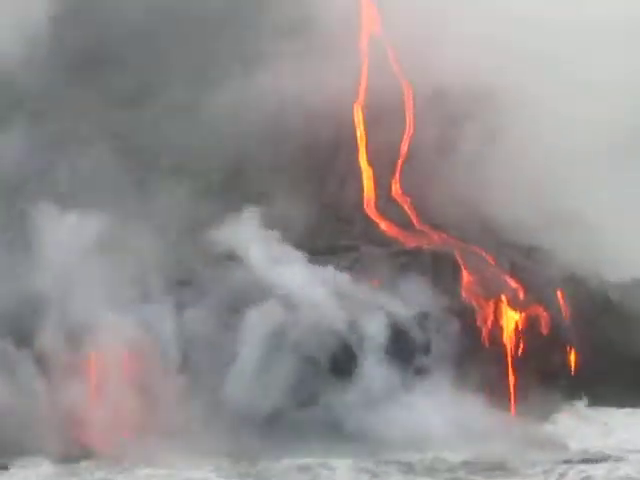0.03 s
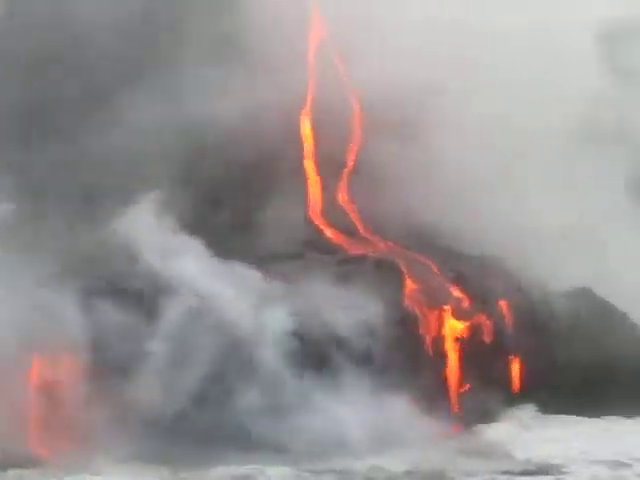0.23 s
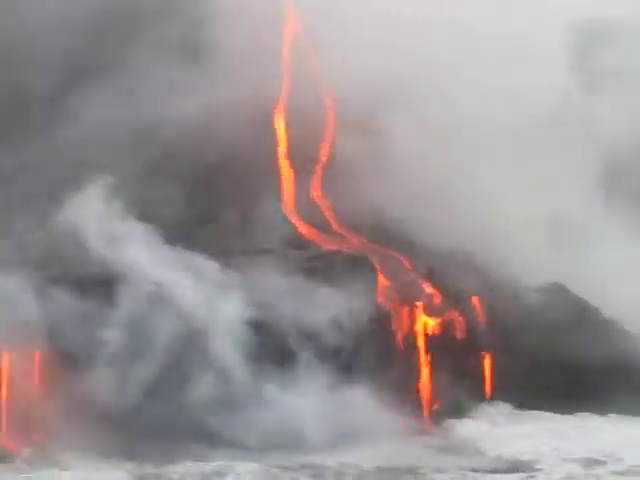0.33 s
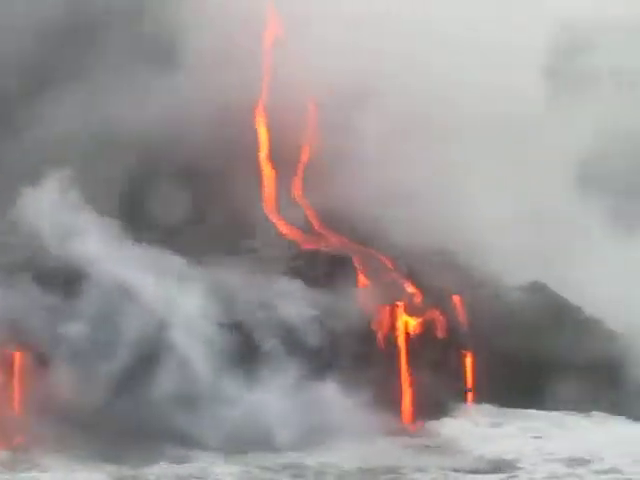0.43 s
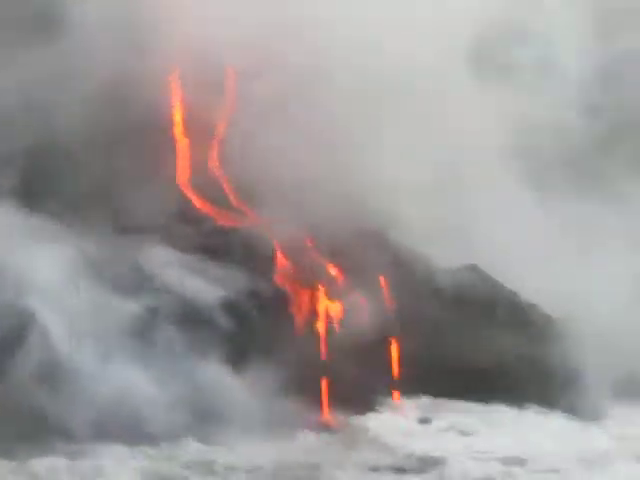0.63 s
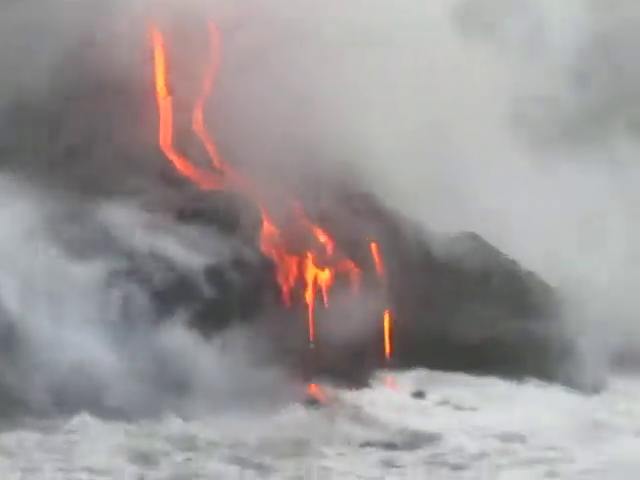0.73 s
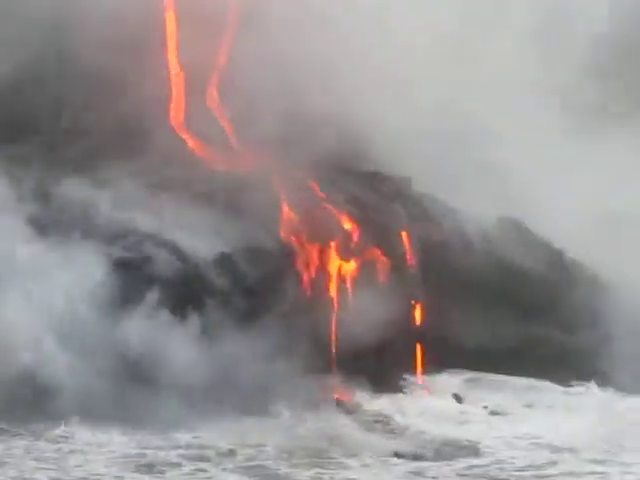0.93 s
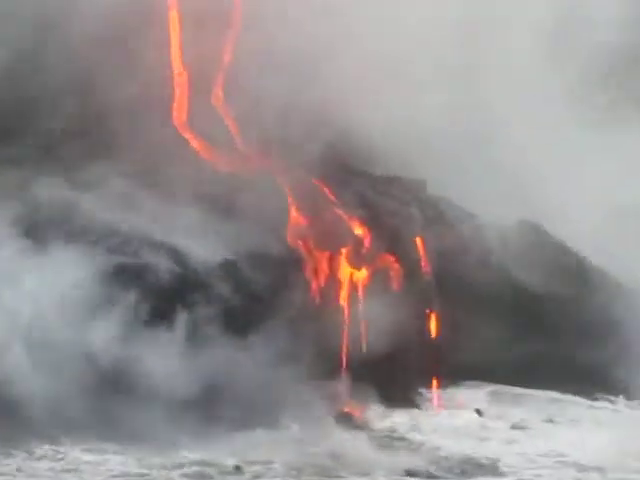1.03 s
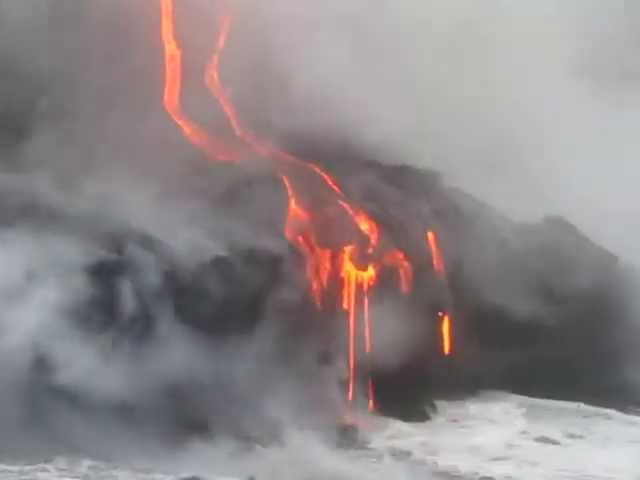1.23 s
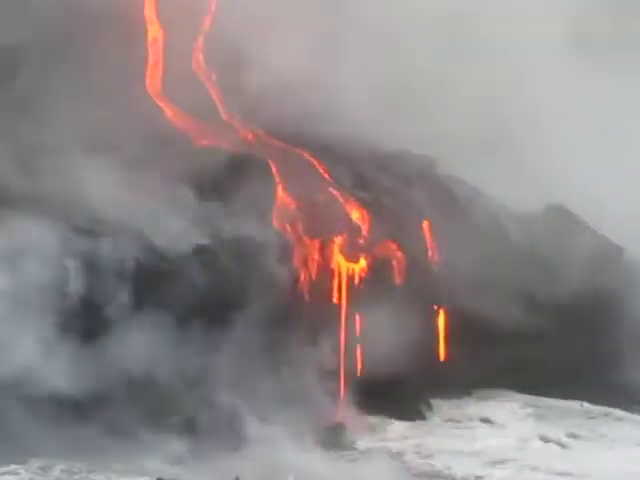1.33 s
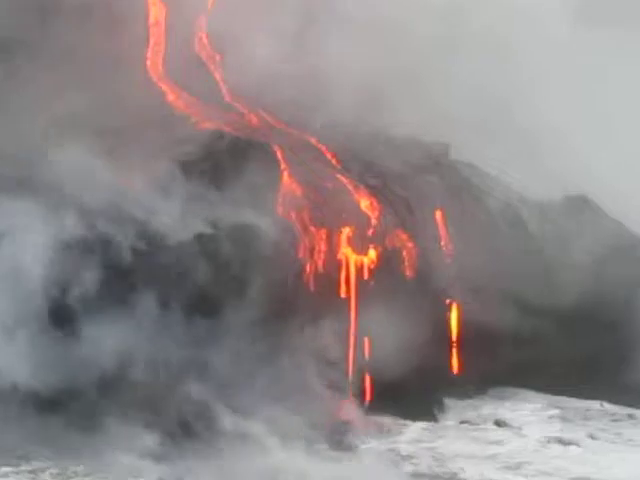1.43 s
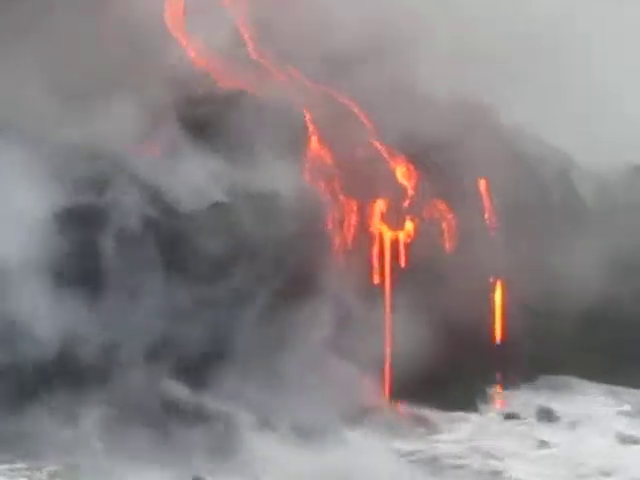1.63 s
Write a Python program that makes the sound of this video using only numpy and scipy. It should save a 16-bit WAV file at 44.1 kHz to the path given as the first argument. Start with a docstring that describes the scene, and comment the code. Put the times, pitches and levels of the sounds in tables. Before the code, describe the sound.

Very close handling noise on a small hand-held camera: one loud dry clack, a weaker knock and brief finger rub, later a light tick, over faint even hiss of sea and lava steam and low wind rumble.

```python
"""Sea cliff, heard from a boat through a small hand-held camera: surf and steam hiss steadily (shaped noise).
The plastic camera body clicks and knocks a few times (blows ring its damped modes).
The hand shoves it with low thumps (smooth pressure pulses) and a finger rubs it (dense slips ring the modes).
Wind and handling rumble lies below (low noise)."""
import sys
import numpy as np
from scipy import signal
from scipy.io import wavfile
from scipy.ndimage import uniform_filter1d

SR = 44100
rng = np.random.default_rng(int(sys.argv[2]) if len(sys.argv) > 2 else 0)


def put_to_file(sound):
    """Save the sound as 16-bit audio at rate SR, in the file named by the first command-line argument."""
    columns = np.atleast_2d(sound).T  # one column per channel
    safe = np.clip(columns, -1, 1)
    whole_steps = np.round(safe * 32767)
    wavfile.write(sys.argv[1], SR, whole_steps.astype(np.int16))


N = 74970


def amp(db):
    """Amplitude factor of a level in dB."""
    return 10 ** (np.asarray(db) / 20)


def evened(x):
    """Scale to unit RMS."""
    return x / np.sqrt(np.mean(x ** 2) + 1e-20)


def curve(points):
    """Per-sample gain from (time_s, level_db): silent before the first point, held after the last."""
    time_s, level_db = np.transpose(points)
    return amp(np.interp(np.arange(N) / SR, time_s, level_db, -200, level_db[-1]))


def noise(spectrum, size, patchy_db, flicker_db):
    """Unit-RMS noise: random short-time spectra, drifting patches, a flicker shared by all pitches."""
    frames = 4 * N // size + 5
    bin_hz = np.fft.rfftfreq(size, 1 / SR)
    real, imag, patches = rng.standard_normal((frames, len(bin_hz), 3)).T
    patches = uniform_filter1d(patches, size=16, axis=0)  # across pitch
    patches = evened(uniform_filter1d(patches, size=10, axis=1))  # across time
    flicker = evened(uniform_filter1d(rng.standard_normal(frames), size=3))
    freq_hz, density_db = np.transpose(spectrum)
    shape_db = np.interp(np.log(bin_hz + 1), np.log(freq_hz + 1), density_db, -90, -90)[:, None]
    gain = amp(shape_db + patchy_db * patches + flicker_db * flicker)
    _, x = signal.istft((real + 1j * imag) * gain, nperseg=size, noverlap=3 * size // 4)
    return evened(x[:N])


# surf and steam spectrum: freq_hz [Hz], density_db [dB per Hz, relative]
HISS_SPECTRUM = [(40, -17), (100, -15.5), (200, -23.5), (420, -23), (700, -26), (890, -23.5), (1050, -27.5),
                 (1250, -26), (1450, -30), (1600, -21.5), (1780, -26), (1950, -27.5), (2500, -29),
                 (3150, -29), (3600, -26.5), (4150, -31), (4500, -36), (5800, -32.5), (8000, -37.5),
                 (10900, -39), (12000, -46.5), (14000, -51), (15600, -55), (16400, -56)]
# surf and steam level: time_s [s], level_db [dB]
HISS_LEVEL_DB = [(0, -51.5), (.2, -51.5), (.5, -53), (.8, -53), (1.1, -51.5), (1.35, -53), (1.7, -52.5)]


def surf_and_steam():
    """Surf and steam: broadband noise with slight patches and flicker."""
    return curve(HISS_LEVEL_DB) * noise(HISS_SPECTRUM, size=1024, patchy_db=0.6, flicker_db=1.2)


# camera body modes: freq_hz [Hz], level_db [dB, relative], t60_s [s]
BODY_MODES = [(180, -1, 0.083), (324, -10, 0.042), (540, -15, 0.036), (685, 7, 0.0072), (848, -5.5, 0.037),
              (924, 2, 0.024), (1260, 2, 0.022), (1678, 0.5, 0.018), (1860, 0.5, 0.015),
              (2105, 5.5, 0.0054), (2910, -2, 0.014), (3635, 1, 0.008), (4102, 3.5, 0.0067),
              (4665, 4.5, 0.0027), (5830, -1, 0.0087), (6600, 0, 0.0052), (8170, 8, 0.0034),
              (10060, 0.5, 0.005), (13700, -5.5, 0.0053)]
RISE_CYCLES = 0.42  # build-up constant of a mode, in its own cycles


def body_ring(pitch_hz, breadth_octaves, t60_share):
    """Body's answer to one contact: damped modes, those near the contact's pitch ring most."""
    freq_hz, level_db, t60_s = np.transpose(BODY_MODES)[:, :, None]
    t = np.arange(4000) / SR
    nearness = np.exp(-.5 * (np.log2(freq_hz / pitch_hz) / breadth_octaves) ** 2)
    rise = (1 - np.exp(-t * freq_hz / RISE_CYCLES)) ** 2
    decay = amp(level_db - 60 * t / (t60_share * t60_s))
    return (nearness * rise * decay * np.sin(2 * np.pi * freq_hz * t)).sum(0)


# blows on the body: start_s [s], level_db [dB], pitch_hz [Hz, of the contact], breadth_octaves [octaves],
# t60_share [ring length, share of mode t60], direction [signed strength of the clean contact]
BODY_BLOWS = [(.1559, -26.5, 9800, 1.24, 0.94, -1.09), (.1570, -26.5, 3530, 0.073, 1.8, 1),
              (.159, -40, 6850, 0.16, 2.2, 0.92), (.2164, -30, 4000, 1.2, .8, -1),
              (.2174, -17.5, 1590, 0.23, 0.6, 1), (.2196, -14.5, 1120, 0.95, 0.74, 0.76),
              (.2222, -2.5, 2810, 0.88, 0.61, -1.01), (.2226, -22, 384, 0.64, 0.89, -0.39),
              (.2242, -9, 3070, 1.29, 0.76, -0.38), (.2263, -14.5, 2140, 0.78, 0.23, -1),
              (.228, -42, 9050, .6, 1.1, 0.41), (.2298, -39, 1470, 0.32, 0.64, -0.51),
              (.2355, -35, 1600, 0.44, 0.53, -0.93), (.2426, -29, 2320, 0.58, 1.2, -1.14),
              (.2455, -22, 764, 0.16, 1.68, 0.93), (.2515, -38, 1090, .7, 1.4, 0.84),
              (.262, -55, 850, 0.37, 1.7, 0.62), (.2497, -45.5, 8000, 0.76, 1.4, 0.82),
              (.2695, -50, 5000, 1.6, 1.2, 0.79), (0.2986, -51, 3180, 0.34, 1.6, 0.8),
              (0.334, -41, 880, .3, 1.2, 0.6), (.398, -59, 3500, 0.72, .9, 1),
              (0.404, -39, 3220, 0.55, 1.3, 0.89), (0.4141, -38.5, 1620, 0.14, 1.5, 1),
              (0.417, -31, 1420, 1.1, 1.36, -0.13), (.4185, -45, 400, 0.66, 0.73, -1),
              (.4195, -26, 945, 0.22, 0.75, 0.35), (.4242, -37, 880, 0.52, 1.1, 0.84),
              (.433, -50, 600, 0.41, 0.92, 1), (.446, -39.5, 444, 0.97, 1.2, 0.88),
              (.452, -45, 11230, 0.36, 1, 0.81), (.461, -50, 10000, 0.36, 1, 0.85),
              (.659, -48, 9000, 1.2, 0.94, 0.94), (.698, -53.5, 9000, 1.9, 1.1, 1),
              (.7215, -38, 6800, 0.16, 1.3, 1), (.7343, -44, 7800, 1.8, 1.05, 0.75),
              (1.078, -47.5, 8500, 0.57, 1, 1), (1.4171, -25, 7100, 0.37, .9, -0.69),
              (1.4182, -22, 2410, 1.8, 0.87, 1), (1.4196, -19, 1800, 2.3, .6, 0.14),
              (1.4207, -33.5, 1190, 0.91, 1.1, 0.59), (1.4212, -46, 9000, 0.73, 1.1, 0.91),
              (1.4244, -32.5, 169.4, .4, 1.03, 1)]
RATTLE_DB, RATTLE_T60_S = -9, 0.017  # rattle energy re a unit contact


def clicks():
    """Blows ring the body: a clean contact, then a brief decaying rattle of loose parts."""
    out = np.zeros(N + 5000)
    t = np.arange(600) / SR
    rattle_gain = amp(RATTLE_DB - 60 * t / RATTLE_T60_S) / np.sqrt(RATTLE_T60_S * SR / 14)
    rattles = rng.standard_normal((len(BODY_BLOWS), 600)) * rattle_gain
    for blow, rattle in zip(BODY_BLOWS, rattles):
        start_s, level_db, pitch_hz, breadth_octaves, t60_share, direction = blow
        contact = np.append(direction, rattle)
        knock = np.convolve(contact, body_ring(pitch_hz, breadth_octaves, t60_share))
        out[round(start_s * SR):][:4600] += amp(level_db) * knock
    return out[:N]


# low shoves of the hand: middle_s [s], length_s [s, 4 sigma], level_db [dB before the high-pass],
# direction [signed strength]
HAND_SHOVES = [(0.148, .03, -53, 0.7), (.224, 0.0071, -26, -0.8), (0.251, 0.027, -20, 0.62),
               (0.27, .016, -25, 0.83), (0.314, 0.016, -33, 1), (0.428, 0.026, -27.5, -1),
               (0.45, 0.015, -29.5, 0.93), (0.48, 0.022, -34, 0.87), (0.5, 0.025, -38, 0.78),
               (0.509, 0.015, -37.5, -1.1), (.575, 0.027, -43, 0.91), (.62, 0.037, -42, -1.4),
               (0.643, 0.026, -39, 0.95), (0.757, 0.04, -38, 1), (0.84, 0.035, -37, -1.34)]
SHOVE_CUT_HZ = 11


def shoves():
    """Smooth one-sided pushes of pressure that leak away below the microphone's range."""
    t = np.arange(N) / SR
    push = np.zeros(N)
    for middle_s, length_s, level_db, direction in HAND_SHOVES:
        push += direction * amp(level_db) * np.exp(-.5 * ((t - middle_s) / (length_s / 4)) ** 2)
    return signal.lfilter(*signal.butter(1, SHOVE_CUT_HZ, "high", fs=SR), push)


# finger rub: time_s [s], level_db [dB]
RUB_LEVEL_DB = [(.3, -70), (.33, -72), (.37, -53.5), (.41, -51.5), (.425, -53), (.47, -95), (.5, -70)]
RUB_SLIPS_PER_S, RUB_PITCH_HZ, RUB_BREADTH_OCTAVES = 3300, 2170, 1.33


def rub():
    """Dense tiny random slips of skin ring the body."""
    slips = rng.standard_normal(N) * (rng.random(N) < RUB_SLIPS_PER_S / SR)
    ring = body_ring(RUB_PITCH_HZ, RUB_BREADTH_OCTAVES, t60_share=0.85)
    return curve(RUB_LEVEL_DB) * evened(signal.oaconvolve(slips, ring)[:N])


# wind and handling rumble spectrum: freq_hz [Hz], density_db [dB per Hz, relative]
RUMBLE_SPECTRUM = [(5, -27), (11, 6.5), (24, -3), (45, -16), (80, -11.5), (130, -79)]
# wind and handling rumble level: time_s [s], level_db [dB]
RUMBLE_LEVEL_DB = [(0, -52), (.2, -40.5), (.35, -51), (.55, -45), (.7, -51.5), (.9, -52.5), (1.2, -54.5),
                   (1.45, -48.5), (1.7, -49.5)]


def rumble():
    """Wind and handling: low noise, uneven in level."""
    return curve(RUMBLE_LEVEL_DB) * noise(RUMBLE_SPECTRUM, size=8192, patchy_db=1, flicker_db=2.5)


def scene():
    """Sum of all sources, one channel."""
    return (surf_and_steam() + rumble() + clicks() + shoves() + rub())[None]


DUCK_FROM_DB, DUCK_DB_PER_DB = -27, 0.088
PEAK_HOLD_FALL_DB_PER_S = 105
CEILING, EDGE_HZ = 1, 16450


def record(dry):
    """Gain control dips a little after a loud click and recovers; then soft overload and band limit."""
    power = uniform_filter1d(dry[0] ** 2, size=400, origin=199)  # mean of past samples
    power_db = 10 * np.log10(abs(power) + 1e-12)
    fall_db = np.arange(N) * PEAK_HOLD_FALL_DB_PER_S / SR
    held_db = np.maximum.accumulate(power_db + fall_db) - fall_db
    over_db = np.maximum(held_db - DUCK_FROM_DB, 0)
    ducked = dry / amp(DUCK_DB_PER_DB * uniform_filter1d(over_db, size=800, origin=399))
    limited = CEILING * np.tanh(ducked / CEILING)
    low_pass = signal.firwin(1023, EDGE_HZ, window=("kaiser", 9), fs=SR)
    return signal.oaconvolve(limited, low_pass[None], "same")


dry = scene()
out = record(dry)
put_to_file(out)
```